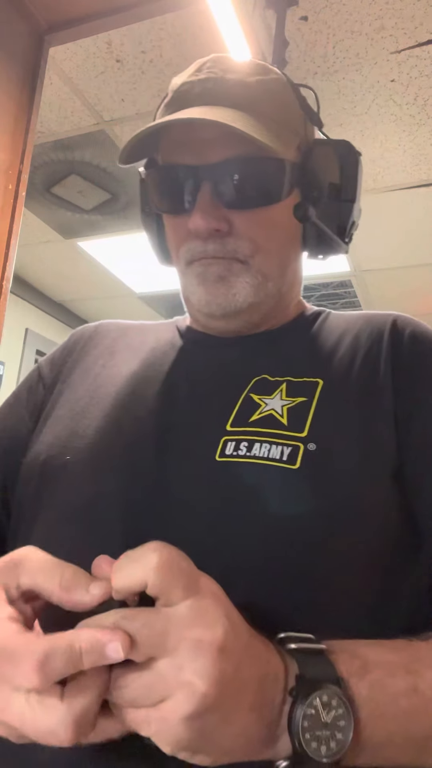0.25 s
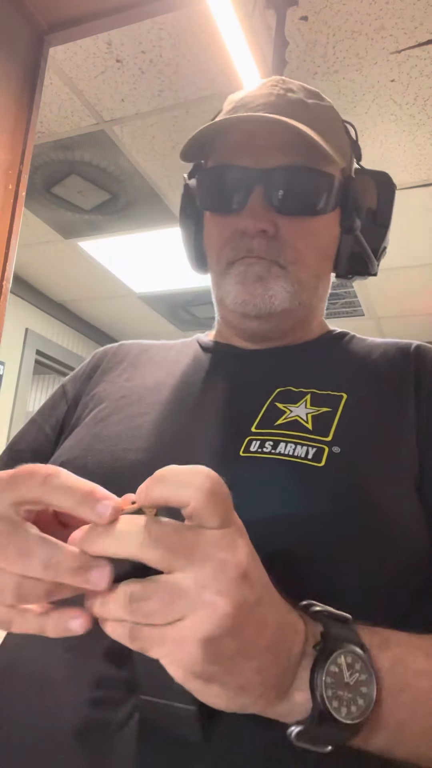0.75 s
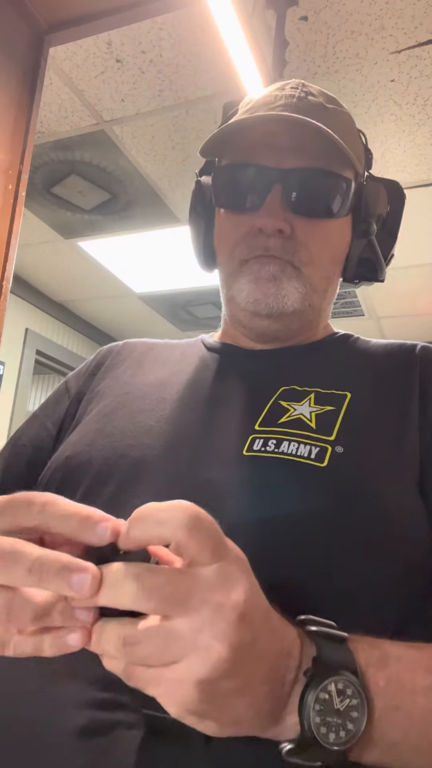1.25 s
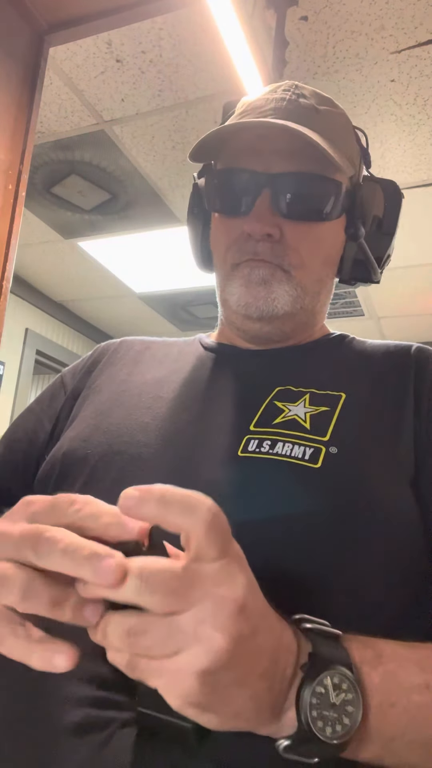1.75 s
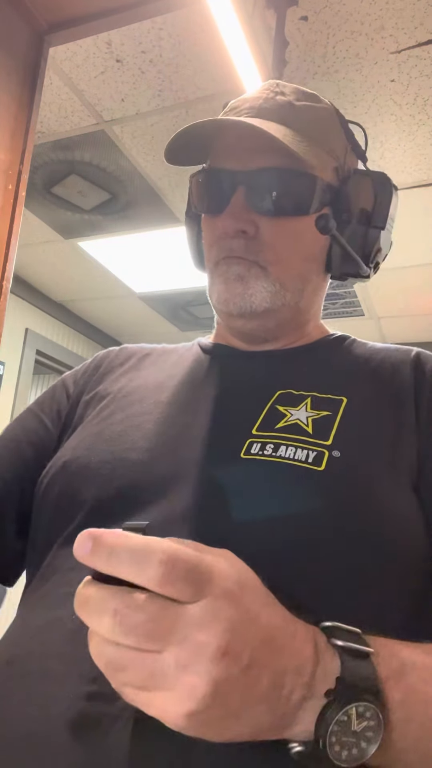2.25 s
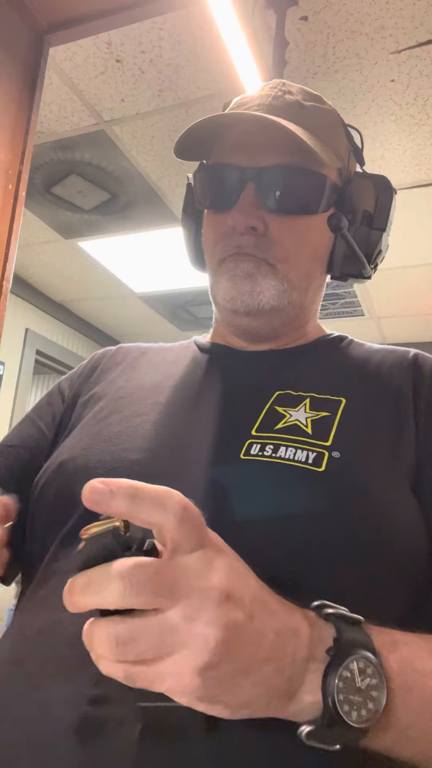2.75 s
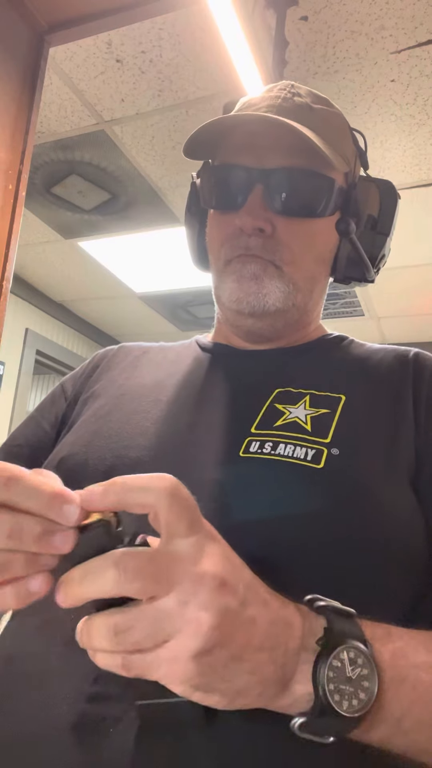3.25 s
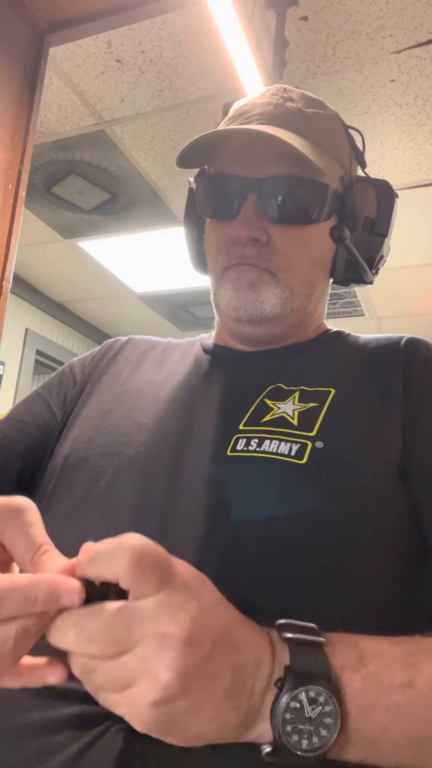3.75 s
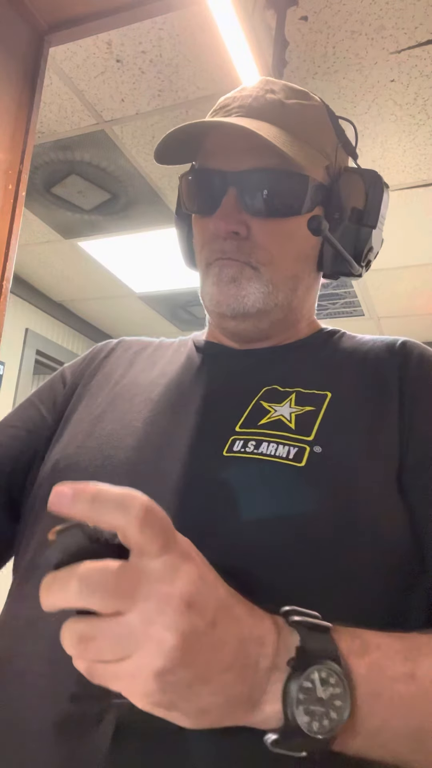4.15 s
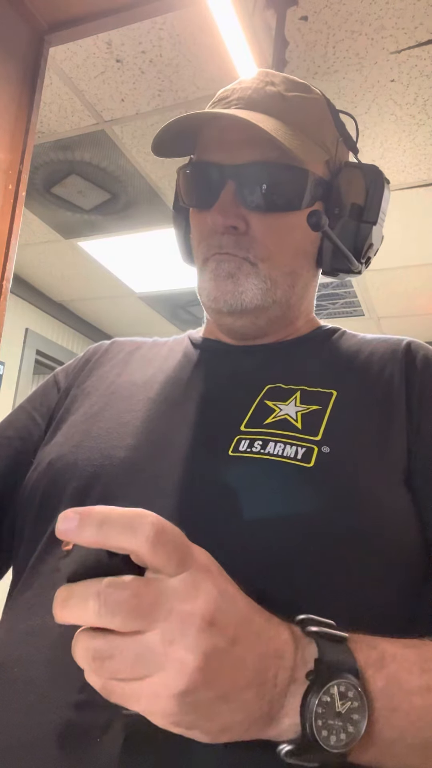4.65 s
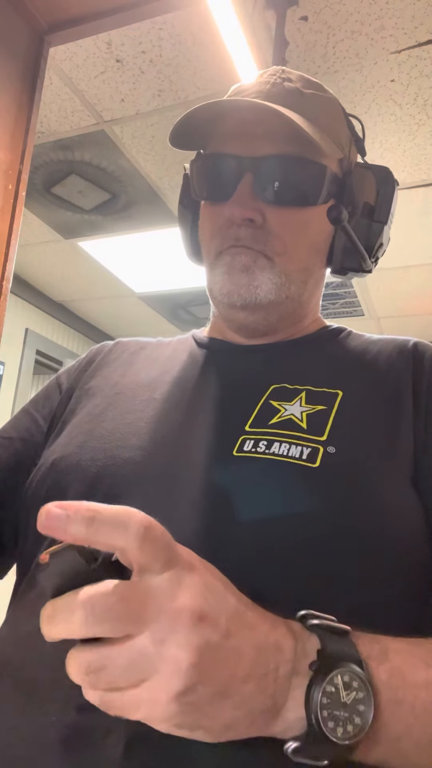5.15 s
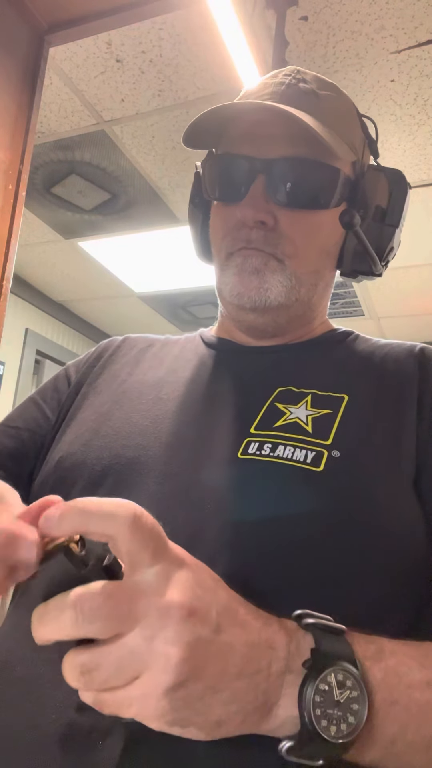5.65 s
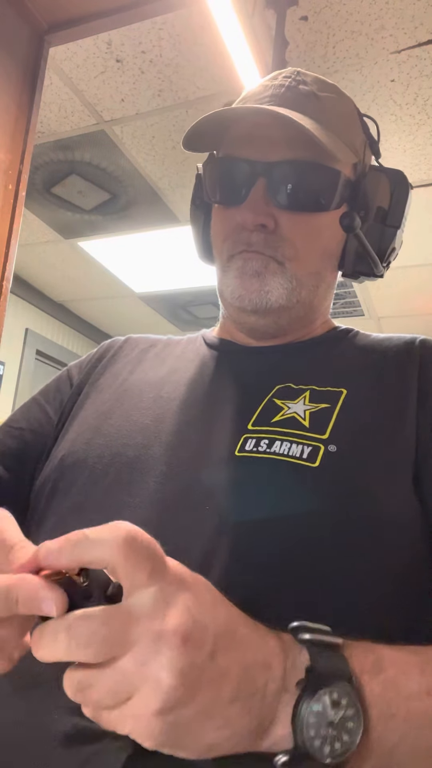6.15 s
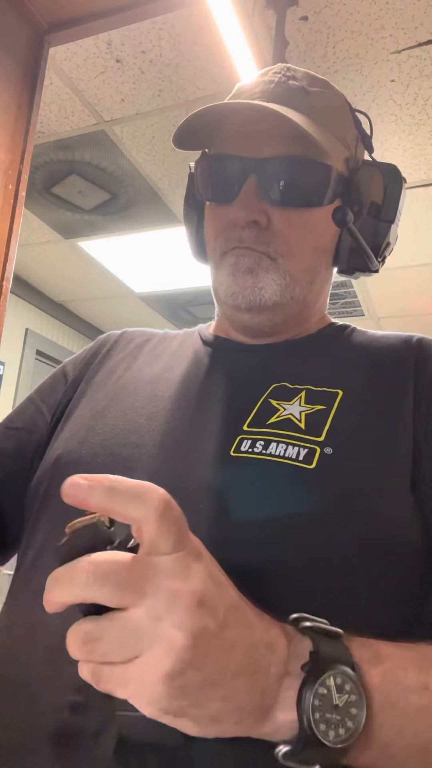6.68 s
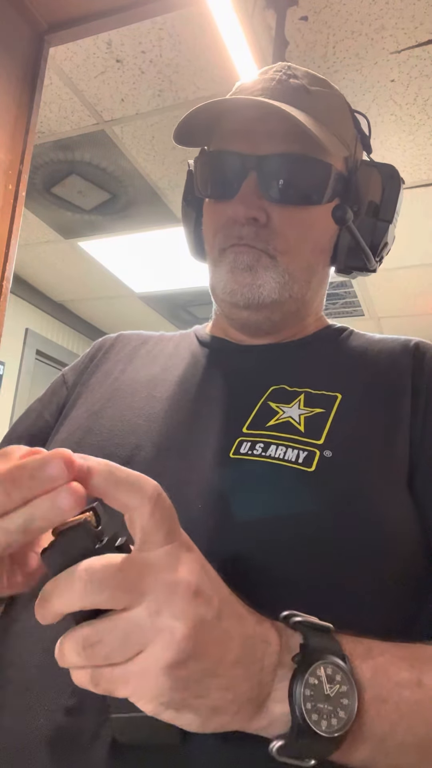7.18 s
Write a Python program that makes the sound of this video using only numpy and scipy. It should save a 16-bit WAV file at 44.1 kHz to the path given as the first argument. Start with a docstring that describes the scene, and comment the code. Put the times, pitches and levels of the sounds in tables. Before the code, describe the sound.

Brass cartridges tick, squeak and snap sharply into a steel magazine in a hard-walled room, over low ventilation hum, with muffled bangs beyond the wall late.

```python
"""Loading a magazine

Cartridges are thumbed into a magazine: struck modes give brass ticks and snaps on the steel lips,
stick-slip friction gives squeaks, shaped noise gives sliding fingers and grinding rims.
A hard-walled room answers by early cluster, echo and decaying tail. Ventilation hums throughout as
wavering lines over duct noise; a few muffled bangs, low-weighted noise, come through the wall near the end."""
import sys
import numpy as np
from scipy import signal
from scipy.fft import rfft, irfft, next_fast_len
from scipy.io import wavfile
from scipy.ndimage import uniform_filter1d, map_coordinates

SR = 44100
rng = np.random.default_rng(int(sys.argv[2]) if len(sys.argv) > 2 else 0)


def waveform_to_disk(signal):
    """Save audio, clipped to [-1, 1], as 16-bit WAV at the path in sys.argv[1]."""
    frames = np.transpose(np.atleast_2d(signal))
    scaled = np.clip(frames, -1, 1) * 32767
    samples = np.round(scaled).astype(np.int16)
    wavfile.write(sys.argv[1], SR, samples)


N = 327222


def amp(db):
    """Decibel law: level to amplitude gain."""
    return 10 ** (np.asarray(db) / 20)


def unit(x):
    """Normalisation: scale to rms 1."""
    return x / np.sqrt(np.mean(x ** 2) + 1e-20)


def along(points, hz):
    """Interpolation of (frequency, value) points on a logarithmic frequency axis."""
    f, v = np.transpose(points)
    return np.interp(np.log(hz + 1), np.log(f + 1), v)


def clock():
    """Sampling: the time of every sample, in seconds."""
    return np.arange(N) / SR


def wobble(rate):
    """Band-limited fluctuation: a smooth random curve with rate knots a second."""
    knots = rng.standard_normal(int(N * rate / SR) + 4)
    return map_coordinates(knots, [clock() * rate])


def filtered(x, response):
    """Linear filtering: multiply the spectrum by a function of frequency."""
    n = x.shape[-1]
    m = next_fast_len(n + 8192)
    return irfft(rfft(x, m) * response(np.fft.rfftfreq(m, 1 / SR)), m)[..., :n]


def causal(gain):
    """Minimum phase: the most compact causal impulse response with these gains."""
    cepstrum = irfft(np.log(np.maximum(gain, 1e-6)))
    half = len(cepstrum) // 2
    cepstrum[1:half] *= 2
    cepstrum[half + 1:] = 0
    return irfft(np.exp(rfft(cepstrum)))


def add(track, s, sound):
    """Superposition: mix a sound into a track at s seconds."""
    part = track[..., max(round(s * SR), 0):][..., :sound.shape[-1]]
    part += sound[..., :part.shape[-1]]


def bump(hz, centre_hz, width_hz):
    """Resonance curve: the Lorentzian power shape, 1 at its centre."""
    return 1 / (1 + (2 * (hz - centre_hz) / width_hz) ** 2)


# Likeness of a diffuse field at the two ports: frequency_hz, left_right_correlation (-1 to 1)
ALIKE = [(60, 1), (130, 1), (290, 0.97), (640, 0.48), (1400, 0.14), (3000, -0.13), (4500, 0.45), (7000, 0),
         (8200, -1), (9500, -1), (11300, -0.47), (13000, 1)]


def diffuse(spectrum, size=N):
    """Diffuse field: stereo noise of rms 1 whose ports are correlated by frequency."""
    def mid_and_side(hz):
        angle = np.arccos(np.clip(along(ALIKE, hz), -1, 1)) / 2
        return amp(along(spectrum, hz)) * [np.cos(angle), np.sin(angle)]

    mid, side = filtered(rng.standard_normal((2, size)), mid_and_side)
    return unit(np.array([mid + side, mid - side]))


# Fan lines and duct resonances: frequency_hz, width_hz, level_db (rms)
HUM = [(50.2, 1.8, -49.5), (58.46, 1.7, -46.5), (66.8, 6, -43), (96.56, 1.5, -39.5), (139.7, 3.6, -53),
       (154.8, 6, -49), (241.3, 10, -59.5)]
# Broad spectrum of the duct air: frequency_hz, relative_density_db (per Hz)
AIR = [(22, -40.5), (45, -2.5), (100, 0), (160, -9.5), (250, -15), (400, -21.5), (600, -27), (1200, -33.5),
       (2000, -33.5), (3000, -39), (7000, -51), (8800, -63.5), (12000, -63), (16000, -61)]


def ventilation(air_db=-39, drift_db=1.16):
    """Narrow-band tones and turbulence: wavering fan lines over the rush of air in the ducts."""
    t, hum = clock(), np.zeros(N)
    for f, width, db in HUM:
        sway = wobble(2 * width) + 1j * wobble(2 * width)
        # partial levelling: a fan wanders more in pitch than in strength
        steadied = sway / np.sqrt(np.abs(sway) ** 2 + .5)
        hum += amp(db) * unit(np.real(steadied * np.exp(2j * np.pi * f * t)))
    # low-frequency resonances and dips of the duct (Hz, dB)
    duct_bass = [(70, 2.0), (110, -2.0), (128, -6), (170, 3)]
    air = filtered(diffuse(AIR), lambda hz: amp(along(duct_bass, hz)))
    return hum + air * amp(air_db + drift_db * wobble(3.415))


# Spectrum of skin on the magazine: frequency_hz, relative_density_db (per Hz)
SKIN = [(1000, -13.5), (2500, 5), (4500, 5), (6800, 4), (9000, -13.5), (11500, 2.5), (15500, -3),
        (17000, -21)]
# The firmer slides of the fingers: middle_s, length_s, relative_level_db
RUBS = [(0.87, 0.046, -65), (2.306, 0.08, -68), (2.446, 0.073, -66.5), (3.27, 0.052, -68),
        (3.638, 0.062, -60.5), (4.002, 0.084, -55.5), (4.443, 0.041, -54.5), (4.558, 0.087, -62),
        (4.793, 0.044, -63), (4.886, 0.027, -69.5), (5.201, 0.034, -73), (6.181, 0.11, -62.5),
        (6.556, .07, -64)]
FIDGET_DB, FIDGET_SWING_DB, FIDGETS_PER_S = -72, 5, 6.3  # the grip keeps shifting in between


def hands(slide_lift_db=5, grain_db=2):
    """Sliding friction as modulated noise: fingers hiss over the magazine and never quite rest."""
    t = clock()
    slides = sum(amp(db + slide_lift_db) * np.exp(-2 * ((t - s) / length) ** 2) for s, length, db in RUBS)
    fidget = amp(FIDGET_DB + FIDGET_SWING_DB * wobble(FIDGETS_PER_S))
    hiss = unit(diffuse(SKIN) * amp(grain_db * wobble(200)))
    return (slides + fidget) * hiss


CONTACT_MS = 0.76  # time constant of the metal faces' chatter


def chatter(size=2048):
    """Contact noise: metal faces rattle briefly, with energy spread evenly over the broad bands."""
    u = np.arange(size) / SR / (CONTACT_MS / 1000)
    z = rfft(rng.standard_normal(size) * u * np.exp(-u))
    smooth_power = np.abs(uniform_filter1d(np.abs(z) ** 2, size=41))
    even = irfft(z / np.sqrt(smooth_power + 1e-12))
    return even[:size // 2]


# The magazine's ringing modes: frequency_hz, relative_level_db, t60_s
STEEL = [(1450, 0, .1), (2010, 1, .1), (2610, 7.5, 0.16), (2760, 6, .18), (2950, 2.5, 0.11), (3310, 0, .18),
         (3700, -5, 0.19), (4100, -2.5, .25), (4560, -6.5, .25), (4790, -6.5, .27), (5760, -2, .25),
         (12740, -17, .15)]
# Spectrum of the contact crack: frequency_hz, relative_density_db (per Hz)
CRACK = [(300, -26), (550, -6.5), (1050, -8.5), (1400, -5), (1800, -5), (2600, -5), (3200, -9.5),
         (3800, -6.5), (4600, -7.5), (5300, -10.5), (5850, -6), (7000, -8.5), (8200, -6.5), (9500, -10.5),
         (11300, -7.5), (13000, -10.5), (15500, -10.5), (17000, -26.5)]
RING_DB, RING_WIDTH_HZ, KNOCK_WIDTH_HZ = 7, 1080, 244  # the case's bright ring and hollow knock
DETUNE = .005  # relative spread of each mode's pitch, by grip and load, from blow to blow
LOOSE_HZ = 45  # the loose rounds smear each mode over this width


def strike(knock_db, treble_db, rings_hz, knock_hz, hollow_db, light_db=0,
           crack_db=27, steel_db=-41, coupling=0.31):
    """Modal excitation: chatter coloured by the case resonances, then the magazine's ringing."""
    t, hz = np.arange(SR // 3) / SR, np.fft.rfftfreq(2048, 1 / SR)
    low_tilt = knock_db * along([(2200, 0.9), (3400, 0.024)], hz)
    high_tilt = treble_db * along([(7500, 0.011), (11000, 1.0)], hz)
    case = RING_DB * sum(bump(hz, f, RING_WIDTH_HZ) for f in rings_hz)
    case = case + hollow_db * bump(hz, knock_hz, KNOCK_WIDTH_HZ)
    colour = amp(along(CRACK, hz) + low_tilt + high_tilt + case)
    crack = signal.fftconvolve(chatter(), causal(colour))

    # a random walk of phase, in cycles, shared by all modes
    smear = np.cumsum(rng.standard_normal(len(t))) * np.sqrt(LOOSE_HZ / (2 * np.pi * SR))
    shell = np.zeros(len(t))
    for f, level, t60 in STEEL:
        # modes near the case resonances take up the most
        mode_db = level + coupling * np.interp(f, hz, case) + rng.normal(0, 2.4)
        pitch = f * (1 + DETUNE * rng.standard_normal())
        wave = np.sin(2 * np.pi * (pitch * t + smear + rng.random()))
        shell += amp(mode_db - 60 * t / t60) * wave
    sound = amp(steel_db + light_db) * shell * (1 - np.exp(-t / 0.0038))
    add(sound, 0, amp(crack_db) * crack)
    return sound


LIGHT_STEEL_DB = 2.5  # extra steel ringing, relative to the crack, in light contacts


def jostle(level_db=-51, spread_db=2, knock_db=-3, treble_db=-12, ring_hz=4000, knock_hz=1950,
           hollow_db=8, count=14):
    """Random impulses convolved with one impact response: very faint taps at chance moments."""
    blows = np.zeros(N)
    blows[rng.integers(N, size=count)] = amp(level_db + spread_db * rng.standard_normal(count))
    tap = strike(knock_db, treble_db, [ring_hz], knock_hz, hollow_db, LIGHT_STEEL_DB)
    return signal.fftconvolve(blows, tap)[:N]


# Brass taps the steel lips: start_s, relative_level_db, knock_tilt_db, treble_tilt_db, ring_pitch_hz,
# knock_pitch_hz, hollowness_db
TICKS = [(0.4464, -37, 1, -18, 3950, 700, 6), (0.4595, -37.5, -2.5, 3, 4000, 1490, 13),
         (0.4627, -35, 5.5, -3, 4000, 555, 16.5), (0.4821, -34, -14, -10, 4600, 1900, 5),
         (0.4996, -29.5, -11, -15, 4300, 1500, 12), (1.2607, -27, 3, -10, 4350, 1874, 18),
         (1.267, -36, 0, -10, 2900, 2920, 12), (1.3272, -29, -7.5, -21, 4370, 1510, 9),
         (1.3548, -32.5, -9, -13, 4300, 1800, 5), (1.363, -29, -6, -17, 4300, 1390, 5),
         (1.3744, -33, -3.5, -11.5, 4500, 1400, 5), (1.379, -31, -9, -11.5, 4520, 1800, 5),
         (1.5145, -13.5, -4.5, -7, 4400, 1510, 13), (1.5182, -21, -4.5, -10.5, 5900, 2550, 12),
         (1.5208, -21, 0.5, -11.5, 3000, 1900, 5), (1.6518, -20, -2.5, -7.5, 3720, 3730, 6),
         (1.6635, -32.5, 8, -13, 3900, 1870, 10), (2.9893, -23, -16, -13.5, 3850, 1900, 13),
         (3.054, -36, -8, -18, 4290, 2000, 4.5), (3.112, -30, -6.5, -32, 3770, 1900, 11),
         (3.462, -23.5, -6.5, -15.5, 3390, 1600, 0), (3.47, -29.5, -0.5, -23, 3680, 1810, 5),
         (3.593, -37.5, -2.5, -10, 3970, 960, 12), (3.7027, -28, -23, -11, 5850, 1900, 2),
         (3.7192, -11.5, -4.5, -0.5, 5730, 2010, 11), (3.7283, -22, -2.5, -6, 4240, 1400, 11.5),
         (3.753, -23, -2, -10, 4400, 2670, 8), (3.859, -23, -7.5, -21.5, 4900, 2700, 6.5),
         (3.8606, -27, 0.5, -16, 4840, 1160, -5), (3.873, -38.5, 4.5, -25, 3700, 560, 16.5),
         (3.888, -40.5, 3.5, -24, 2700, 570, 22), (3.9474, -32, 1, -21, 2730, 2500, 7),
         (3.955, -38, -2, -27, 2900, 2760, 10), (3.9661, -32, 2, -26, 3000, 1500, 12),
         (3.971, -37.5, -1.5, -25, 2900, 3050, 15), (3.99, -33.5, -6.5, -18, 3800, 3500, 8),
         (4.7031, -44.5, -12, 0.5, 5000, 2000, 2), (5.2465, -23, -9.5, -9.5, 3080, 1970, 7),
         (5.335, -40, 1, -34, 3020, 1500, 6), (5.552, -25.5, -9.5, -20.5, 3450, 2850, 9.5),
         (5.7713, -22, -11.5, -15.5, 4500, 2180, 3), (5.948, -33, 0.5, -12.5, 4200, 2100, 7),
         (6.2333, -26.5, -1, -10, 4100, 1900, 2), (6.3081, -30.5, -1, -9, 3900, 1900, 7),
         (7.305, -27, -2, -22, 3370, 1800, 3)]
REBOUND_S, REBOUND_DB = 0.0043, -10.5  # typical delay and relative level of the second touch


def ticks(scatter=0.21):
    """Impact and rebound: light taps as a round is placed and seated, each touching once more, softly."""
    track = np.zeros(N)
    for s, db, knock_db, treble_db, ring_hz, knock_hz, hollow_db in TICKS:
        rebound_s = REBOUND_S * np.exp(scatter * rng.standard_normal())
        for delay, loss_db in [(0, 0), (rebound_s, REBOUND_DB)]:
            tap = strike(knock_db, treble_db, [ring_hz], knock_hz, hollow_db, LIGHT_STEEL_DB)
            add(track, s + delay, amp(db + loss_db) * tap)
    return track


# A round is drawn along the one below: start_s, length_s, level_db
DRAGS = [(2.96, 0.08, -58.5), (3.407, 0.06, -56), (3.613, 0.04, -58.5), (3.723, .035, -34),
         (3.939, 0.09, -46), (5.605, .04, -53.5), (5.675, 0.028, -47)]
GRIND_AFTER = 1  # the grinding's length after the snap over that before


def scrapes(grain_db=3.0, catch_db=3.5):
    """Rough sliding: the rim grinds over the round below around every snap and in longer drags."""
    t = clock()
    around_snaps = [(s - lead, lead * (1 + GRIND_AFTER), db) for s, *_, lead, db in SNAPS]
    strokes = around_snaps + DRAGS
    push = sum(amp(db) * np.exp(-(2 * (t - s) / length - 1) ** 4) for s, length, db in strokes)
    grit = rng.standard_normal(N) * amp(grain_db * wobble(900) + catch_db * wobble(120))
    colour = [(300, -16.5), (700, -4.0), (2200, -0.5), (6000, -5.5), (10000, -26.0)]  # (Hz, dB)
    return push * unit(filtered(grit, lambda hz: amp(along(colour, hz))))


SING_WIDTH_HZ, SING_T60 = 340, .19  # the lips' cluster of close high modes; decay in s


def singing(centre_hz):
    """Beating of close modes: the sprung lips ring on as decaying narrow-band noise."""
    t = np.arange(SR // 2) / SR
    modes = filtered(rng.standard_normal(len(t)), lambda hz: bump(hz, centre_hz, SING_WIDTH_HZ))
    return unit(modes) * amp(-60 * t / SING_T60) * (1 - np.exp(-t / 0.0008))


# A round grinds past the lips and snaps home: start_s, relative_level_db, knock_tilt_db, treble_tilt_db,
# ring_pitch_hz, upper_ring_pitch_hz, knock_pitch_hz, hollowness_db, singing_level_db,
# grinding_before_s, grinding_level_db
SNAPS = [(1.512, -11.5, -9.5, -7, 4750, 5860, 1460, 13, -30.5, 0.0061, -38),
         (3.721, -5.5, -7, -2.5, 4130, 5700, 866, 4.5, -43, 0.017, -32),
         (6.3117, -5, -13.5, -6, 4700, 5820, 1910, 10, -37.5, 0.011, -33.5)]
SETTLE_S, SETTLE_DB, SETTLE_FADE_DB = .038, -18.5, -14  # stack's rattle: span, level, change by the end


def snaps(stack_ring_hz=2500, stack_knock_hz=1450, stack_knock_db=-4, stack_treble_db=-16,
          stack_hollow_db=9, count=6):
    """Impact of a sprung stack: each round jumps home, then those below clink at their own pitches."""
    track = np.zeros(N)
    for s, db, knock_db, treble_db, ring_hz, upper_hz, knock_hz, hollow_db, sing_db, *_ in SNAPS:
        add(track, s, amp(sing_db) * singing(upper_hz))
        blow = strike(knock_db, treble_db, [ring_hz, upper_hz], knock_hz, hollow_db)
        add(track, s, amp(db) * blow)
        for k in range(count):
            u = (k + .5 + rng.random()) / count
            ring, knock = np.exp(0.15 * rng.standard_normal(2)) * [stack_ring_hz, stack_knock_hz]
            clink = strike(stack_knock_db, stack_treble_db, [ring], knock, stack_hollow_db, LIGHT_STEEL_DB)
            add(track, s + SETTLE_S * u, amp(db + SETTLE_DB + SETTLE_FADE_DB * u) * clink)
    return track


# How the feed lips radiate: frequency_hz, gain_db
LIPS = [(1200, -9.5), (1900, -1), (2400, -4), (3900, -3), (4600, -4.5), (5300, -8), (6800, -1.5),
        (8500, -19), (11000, -30)]
# Brass sliding on steel: start_s, end_s, first_pitch_hz, middle_pitch_hz, last_pitch_hz,
# relative_level_db, slope_db (per overtone), favoured_hz, roughness (0-1)
SQUEAKS = [(1.695, 1.955, 1205, 1289, 1167, -54.5, -2, 2600, .33),
           (1.915, 1.998, 1113, 1055, 1025, -62, 1, 4000, 0.65),
           (2.91, 2.998, 1230, 1257, 1357, -57, -2, 2500, 0.49),
           (3.02, 3.098, 2160, 2185, 2250, -55.5, 0, 4400, 0.28),
           (3.081, 3.165, 2238, 2310, 2344, -53.5, -1.5, 2300, .32),
           (3.232, 3.25, 1492, 1480, 1430, -56, -13, 1480, .5),
           (3.425, 3.462, 5080, 5060, 4990, -61, -3, 5050, .15),
           (3.605, 3.66, 4250, 4440, 4560, -58.5, -3.5, 4400, .6),
           (4.416, 4.494, 4330, 4360, 4290, -50.5, -1, 4370, 0.068),
           (5.618, 5.664, 1127, 1110, 1030, -55, -8, 1100, .8),
           (5.66, 6.07, 2080, 2285, 2020, -55.5, .5, 2300, 0.54),
           (5.71, 6.091, 1902, 1848, 1680, -62, -4.5, 1900, 0.98),
           (6.04, 6.112, 3470, 3330, 3160, -61.5, -7, 3300, 0.46)]
FAVOUR_DB, FAVOUR_WIDTH_HZ = 6.5, 1700  # the lip under the brass lifts overtones near its resonance
SQUEAK_SWELL = 0.41  # level follows the stroke's speed to this power


def squeaks(flutter_db=2, catch_db=3.5):
    """Stick-slip oscillation: a gliding harmonic tone, which uneven slips break and roughen with grit."""
    track, t = np.zeros(N), clock()
    noise = rng.standard_normal(N) * amp(5 * wobble(300))
    grit = unit(filtered(noise, lambda hz: amp(along(LIPS, hz)) * (hz > 900)))
    slip = .04 * wobble(700) + .052 * wobble(46)
    for start, end, first_hz, middle_hz, last_hz, db, slope_db, favoured_hz, rough in SQUEAKS:
        on = (t > start) & (t < end)
        u = 2 * (t[on] - start) / (end - start) - 1  # -1 to 1 over the stroke
        bend = (first_hz + last_hz) / 2 - middle_hz
        pitch = middle_hz + u * (last_hz - first_hz) / 2 + u * u * bend
        phase = 2 * np.pi * np.cumsum(pitch * (1 + rough * slip[on])) / SR
        tone = 0
        for k in range(1, 6):
            lip_db = along(LIPS, k * pitch) + FAVOUR_DB * bump(k * pitch, favoured_hz, FAVOUR_WIDTH_HZ)
            overtone_db = lip_db + slope_db * (k - 1.5) + flutter_db * wobble(55)[on]
            tone = tone + amp(overtone_db) * np.sin(k * phase)
        speed = np.abs(1 - u * u)
        level = amp(db + catch_db * rough * wobble(70)[on]) * speed ** SQUEAK_SWELL
        track[on] += level * (tone + rough * grit[on])
    return track


# A thin, very high squeal as the round is pressed against the spring: start_s, length_s, level_db
SQUEALS = [(3.226, 0.29, -65.5), (3.618, 0.099, -50), (3.97, 0.39, -67)]
SQUEAL_HZ, SQUEAL_WIDTH_HZ = 11200, 170


def squeals(peak_at=.2):
    """Friction-driven mode: rubbing sustains one high mode, swelling quickly and fading gradually."""
    t, level = clock(), np.zeros(N)
    for s, length, db in SQUEALS:
        u = np.maximum(t - s, 0) / (length * peak_at)
        level += amp(db) * u * np.exp(1 - u)
    sway = wobble(2 * SQUEAL_WIDTH_HZ) + 1j * wobble(2 * SQUEAL_WIDTH_HZ)
    return level * unit(np.real(sway * np.exp(2j * np.pi * SQUEAL_HZ * t)))


# Bangs beyond the wall: start_s, relative_boom_db, relative_rattle_db
BANGS = [(6.138, -27, -36), (6.554, -27, -32), (6.774, -32.5, -39.5), (6.94, -36, -48),
         (7.074, -41.5, -51.5)]
# Spectrum of the boom: frequency_hz, relative_density_db (per Hz)
BOOM = [(40, -10.5), (90, -15), (120, -9), (155, 2.5), (200, -4), (260, -4), (350, -14), (600, -25),
        (1500, -66)]
# Spectrum of the wall's rattle: frequency_hz, relative_density_db (per Hz)
RATTLE = [(150, -21), (350, -0.5), (600, 4), (1200, -0.5), (1750, 5.5), (2400, -5), (3100, -4), (5000, -22),
          (7500, -20.5), (10000, -39.5)]
BOOM_ECHO_S, BOOM_ECHO_DB = 0.074, -8  # each boom rolls back once
WALL_HZ, WALL_DB = 153, -3.5  # the wall's own low note, relative to the boom's noise


def bangs(swell=0.033, boom_t60=1.2, boom_tail_db=-7.0, rattle_rise=0.0056, rattle_t60=0.15,
          rattle_db=7, rattle_tail_db=-5, rattle_tail_t60=0.58, lumpy_db=0.4):
    """Transmission through a wall: it rattles first, then a low boom swells, rolls back and lingers."""
    boom_power, rattle_power = np.zeros(N), np.zeros(N)

    def surge(t):
        return (np.maximum(t, 0) / swell) ** 2 * np.exp(1 - (t / swell) ** 2)

    for s, low_db, high_db in BANGS:
        t = np.maximum(clock() - s, 0)
        tail = (1 - np.exp(-t / swell)) * amp(boom_tail_db - 60 * t / boom_t60) ** 2
        rollback = amp(BOOM_ECHO_DB) ** 2 * surge(t - BOOM_ECHO_S)
        boom_power += amp(low_db) ** 2 * (surge(t) + rollback + tail)
        fade = amp(rattle_db - 60 * t / rattle_t60) ** 2
        fade += amp(rattle_tail_db - 60 * t / rattle_tail_t60) ** 2
        rattle_power += (amp(high_db) * (1 - np.exp(-t / rattle_rise))) ** 2 * fade
    note = unit(np.sin(2 * np.pi * WALL_HZ * clock() + .9 * wobble(35)))
    boom = np.sqrt(boom_power) * unit(diffuse(BOOM) + amp(WALL_DB) * note)
    rattle = np.sqrt(rattle_power) * unit(amp(lumpy_db * wobble(110)) * diffuse(RATTLE))
    return boom + rattle


# Decay of the late tail: frequency_hz, t60_s
ROOM = [(300, 0.15), (1500, 0.41), (4500, 0.55), (7000, 0.47), (13000, 0.48)]
# Colour of the reflections: frequency_hz, reflected_level_db
WALLS = [(300, -3), (1000, 4), (2500, 7.5), (4500, 0), (6500, -3.5), (12000, -4), (16000, -14.5)]
ECHO_S = .057  # there and back to the far wall


def room(x, early_db=-5, early_t60=0.089, late_db=-11, gap=0.00083, echo_db=-22):
    """Reverberation by convolution: near surfaces cluster, the far wall echoes, the room decays."""
    f, t, z = signal.stft(diffuse(WALLS, size=SR * 3 // 4), SR, nperseg=256)
    late = signal.istft(z * amp(-60 * t / along(ROOM, f)[:, None]), SR, nperseg=256)[1]
    t = np.arange(late.shape[1]) / SR
    early = diffuse(WALLS, size=len(t)) * amp(-60 * t / early_t60)
    echo_colour = [(2000, -4), (5300, -5), (5850, 5), (6400, -6), (12000, -12)]  # (Hz, dB)
    echo_fade = amp(-60 * np.abs(t - ECHO_S) / .035) * (t > ECHO_S)
    echo = diffuse(echo_colour, size=len(t)) * echo_fade * amp(2 * wobble(700)[:len(t)])
    parts = [(early_db, early), (echo_db, echo), (late_db, late)]
    answer = sum(amp(db) * part / np.linalg.norm(part[0]) for db, part in parts)
    onset = 1 - np.exp(-(t / gap) ** 2)
    return signal.fftconvolve(x[None], answer * onset, axes=1)[:, :N]


# Phase between the ports for direct sound: frequency_hz, left_lead_rad
PORTS = [(0, 1.5), (1380, 1.02), (2580, -3), (2840, -8), (3360, -6.5), (5510, -5), (6800, -4.5), (7750, -3),
         (10200, -3), (11500, -1.1), (14000, 1), (16200, 3)]


def at_ports(x):
    """Phase difference between receivers: split the frequency-dependent lead between two ports."""
    return filtered(x, lambda hz: np.exp(.5j * along(PORTS, hz) * np.array([[1], [-1]])))


def scene(snap_room_db=-0.5, tick_room_db=-5.5, sliding_room_db=-3, count=3):
    """Superposition of direct and reflected sound; the fingers shield the room from lighter sounds."""
    background = ventilation() + hands()
    tick = jostle() + ticks()
    sliding = scrapes() + squeaks() + squeals()
    direct = at_ports(snaps() + tick + sliding)
    # each face of the magazine throws its own colour of a snap into the room
    thrown = amp(snap_room_db) * sum(room(snaps()) for _ in range(count)) / np.sqrt(count)
    spilled = room(amp(tick_room_db) * tick + amp(sliding_room_db) * sliding)
    return background + direct + thrown + spilled + bangs()


DUCK_ABOVE_DB, DUCK_SHARE = -24, 0.33  # threshold; share of the excess taken off
RECOVER_DB_PER_S = 22


def gain_control(x, size=256):
    """Dynamic compression: the gain drops just after a loud sound and creeps back."""
    power = np.abs(uniform_filter1d(np.mean(x ** 2, axis=0), size))
    excess_db = np.maximum(10 * np.log10(power + 1e-12) - DUCK_ABOVE_DB, 0)
    ramp = RECOVER_DB_PER_S * clock()
    # a running maximum against the ramp gives a steady release
    cut_db = np.maximum.accumulate(DUCK_SHARE * excess_db + ramp) - ramp
    delayed_cut_db = np.pad(uniform_filter1d(cut_db, size), (size, 0))[:N]
    return x * amp(-delayed_cut_db)


# Balance of the ports: frequency_hz, left_over_right_db
LEFT_DB = [(150, 0), (380, 1.1), (1200, 2.5), (2400, 3), (4500, 0), (12000, -0.5)]
TOP_HZ = 16600  # band limit


def record(dry):
    """Transduction: port balance, gain control, soft saturation of the tallest peaks and a band limit."""
    balanced = filtered(dry, lambda hz: amp(along(LEFT_DB, hz) * np.array([[.5], [-.5]])))
    heard = gain_control(balanced)
    rounded = heard / (1 + np.abs(heard / .85) ** 6) ** (1 / 6)
    return filtered(rounded, lambda hz: hz < TOP_HZ)


dry = scene()
out = record(dry)
waveform_to_disk(out)
```